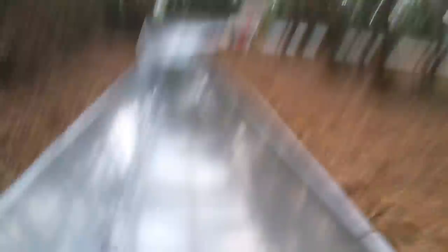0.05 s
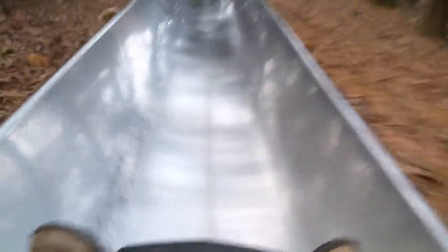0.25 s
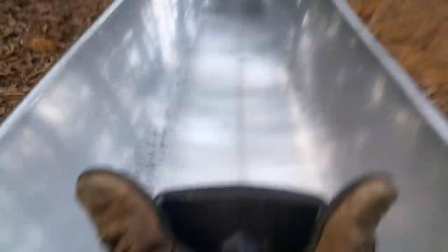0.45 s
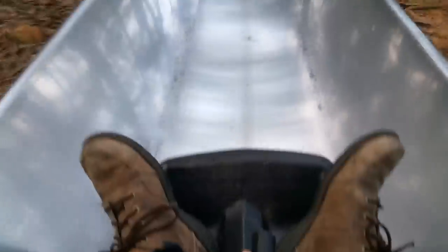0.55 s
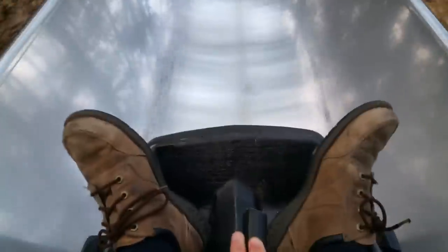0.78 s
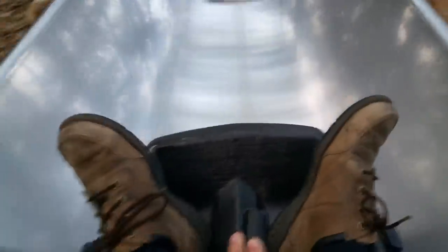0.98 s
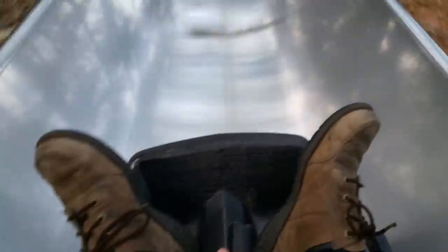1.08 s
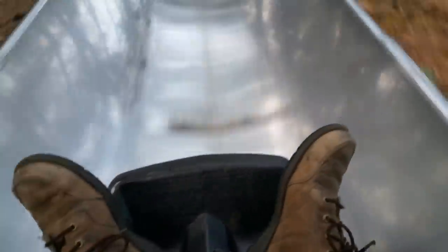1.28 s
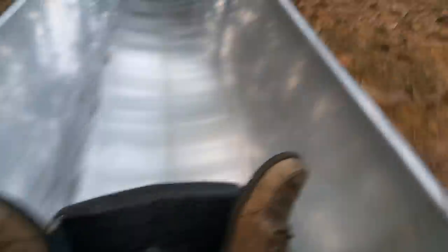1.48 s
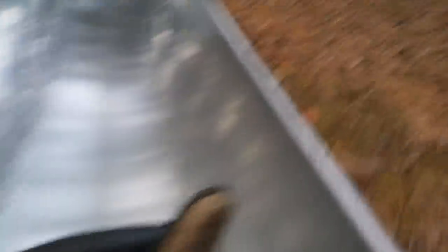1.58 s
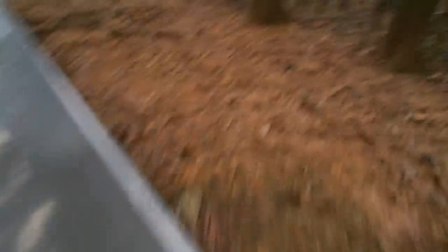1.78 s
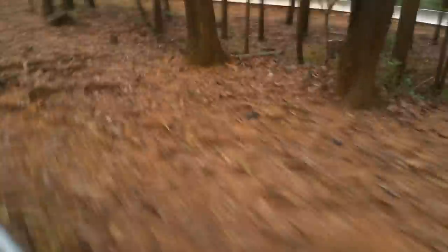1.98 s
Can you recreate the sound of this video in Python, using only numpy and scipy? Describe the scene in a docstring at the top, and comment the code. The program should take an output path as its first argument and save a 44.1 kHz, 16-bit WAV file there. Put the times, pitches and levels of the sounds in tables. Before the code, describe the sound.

A sled rumbles and hisses down a metal chute outdoors, heard from the rider's seat. It bangs and clatters over two seams, quietens, then knocks over a third, as loose fittings rattle and light wind brushes the microphone.

```python
"""A sled runs down a sheet-metal chute in a wood, heard from the rider's seat.
From the start the runners rumble and hiss on the metal and wind brushes the microphone.
Small bumps knock the hollow body into resonance, and loose fittings rattle. Near 0.5 s the sled
bangs and clatters across a seam, and near 0.9 s, hardest of all, across a second.
The ride then quietens until a third seam at 1.7 s, and runs on to the end at about 2 s."""
import sys
import numpy as np
from scipy import signal
from scipy.fft import rfft, irfft
from scipy.io import wavfile

SR = 44100
rng = np.random.default_rng(int(sys.argv[2]) if len(sys.argv) > 2 else 0)


def pcm_store(signal):
    """Save signal as 16-bit PCM."""
    levels = np.round(np.clip(np.atleast_2d(signal), -1, 1) * 32767)
    wavfile.write(sys.argv[1], SR, levels.astype(np.int16).T)


N = 90404

# Spectrum of the wind's buffeting; all spectra give relative levels (f/Hz, level/dB)
WIND_SPECTRUM = [(15, -33), (40, 15), (80, 11), (140, -1.5), (400, -36), (16000, -97)]
WIND_DB = -48

# Course of the running noise (t/s, rumble level/dB, hiss level/dB, deep rumble level/dB)
RIDE_LEVELS = [(0, -34.5, -40.5, -44), (.19, -35.5, -42, -53), (.27, -30.5, -39, -33), (.36, -34, -39, -34),
               (.45, -39, -40.5, -47), (.58, -40, -34, -29), (.68, -36.5, -38.5, -39),
               (.79, -37, -41.5, -27.5), (.85, -29.5, -41.5, -35), (.91, -30, -39.5, -24),
               (1.06, -26.5, -38.5, -38), (1.17, -32, -44, -34), (1.229, -33, -50.5, -44.5),
               (1.39, -37, -51.5, -45), (1.55, -35.5, -53, -43.5), (1.68, -33.5, -52, -39.5),
               (1.78, -29, -45, -39), (1.952, -37, -47, -42.5), (2.05, -31, -38.5, -34)]
# Spectrum of the runners' rumble (f/Hz, level/dB)
RUMBLE_SPECTRUM = [(25, -30.5), (110, -17), (175, -15), (220, -0.5), (255, -3), (300, 2), (350, -10),
                   (430, -12), (520, -3.5), (620, -18.5), (720, -11), (950, -22.5), (1400, -24.5),
                   (2000, -37.5), (5000, -42), (16000, -66)]
# Spectrum of the sliding hiss (f/Hz, level/dB)
HISS_SPECTRUM = [(100, -23), (390, -2.5), (520, 7), (750, 8.5), (1100, 2), (1500, 2), (2000, -7),
                 (2600, -3.5), (3100, -8.5), (3800, -8), (5000, -12), (7200, -12), (8200, -25.5),
                 (12000, -25.5), (16000, -29)]
# Spectrum of the deep rumble (f/Hz, level/dB)
DEEP_SPECTRUM = [(20, -19), (45, 5.5), (80, 4), (115, 4.5), (165, 4), (240, -2.5), (500, -28), (16000, -78)]
JUDDER_DB, JUDDER_HZ = 1.76, 46

# Free vibrations of the metal (f/Hz, level/dB, t60/s)
METAL_MODES = [(918, -2, 0.26), (1032, -11, .15), (1089, 0, 0.16), (1252, 0.5, 0.086), (1500, 3, 0.12),
               (2670, 9, 0.055), (3630, 0, 0.065), (3800, -0.5, 0.095), (4730, -10, .1), (5740, 0.5, 0.078),
               (6500, -2, 0.074), (7320, -20, 0.057)]
# Impacts of loose fittings (t/s, level/dB, treble corner f/Hz)
FITTING_STRIKES = [(0.054, -28.5, 5800), (0.0748, -23.5, 14200), (0.114, -34.5, 9900), (.126, -29, 5800),
                   (.199, -39, 7000), (0.21, -26.5, 6000), (0.231, -30.5, 6890), (0.273, -31, 4800),
                   (.281, -31, 5900), (0.365, -28, 6230), (0.386, -39, 7000), (0.429, -31.5, 9240),
                   (.498, -12.5, 9600), (.533, -16, 16000), (0.568, -24.5, 16000), (.604, -31, 14500),
                   (0.749, -29.5, 6000), (0.817, -28, 12100), (0.83, -29.5, 10700), (.853, -35, 6000),
                   (.891, -36.5, 9000), (0.902, -41, 6000), (0.955, -30, 16000), (1.123, -28, 15050),
                   (1.138, -57, 7000), (1.156, -27, 11000), (1.275, -42.5, 10600), (1.284, -52, 7000),
                   (1.425, -50, 9000), (1.451, -50, 12000), (1.571, -46.5, 9000), (1.643, -48, 10000),
                   (1.746, -24, 12900), (1.778, -27.5, 12200), (1.814, -31.5, 9900), (1.869, -31, 6950),
                   (1.887, -35.5, 13800), (1.974, -43, 7000), (1.998, -35.5, 9100), (2.013, -32, 8900),
                   (2.031, -29, 11900)]
# Spectrum of a fitting's tick (f/Hz, level/dB)
TICK_SPECTRUM = [(200, 10), (1500, -12), (2800, -8), (3750, 4), (4900, -4.5), (5850, 5.5), (6400, -3),
                 (7050, 0.5), (8300, -13.5), (9500, -9), (10400, -4.5), (13000, -10.5), (16000, -12)]
TICK_RISE_S, TICK_T60, TICK_TAIL_DB, TICK_TAIL_T60, TICK_RING_DB = 0.0012, 0.04, -24, 0.15, -15

# Runners meeting seams and dents (t/s, hold/s, level/dB, release t60/s, treble corner f/Hz)
RUNNER_CLASHES = [(0.472, 0.0084, -26.5, 0.03, 5200), (0.483, 0.03, -21.5, 0.11, 14000),
                  (0.511, 0.0076, -24, 0.073, 5100), (0.524, .012, -23, 0.12, 15000),
                  (0.561, .005, -32.5, .1, 14000), (0.651, 0.0019, -26.5, 0.03, 3000),
                  (0.705, 0.0046, -31.5, 0.035, 1510), (0.803, 0.031, -34, .1, 6000),
                  (0.92, 0.041, -18.5, 0.24, 13900), (0.933, .004, -10, 0.031, 1430),
                  (1.021, .007, -24.5, 0.19, 7560), (1.08, .003, -39, 0.039, 2500),
                  (1.172, 0.0032, -24, 0.058, 2130), (1.324, 0.0022, -36, 0.068, 2000),
                  (1.41, .004, -41, 0.044, 1490), (1.483, 0.0038, -35, 0.047, 2230),
                  (1.701, 0.021, -26.5, 0.13, 12400), (1.738, 0.0072, -33, 0.073, 15000),
                  (1.77, .006, -35.5, 0.044, 12000), (1.81, .012, -30.5, 0.071, 1700)]
# Spectrum of a clash (f/Hz, level/dB)
CLASH_SPECTRUM = [(40, -15.5), (250, 4), (700, 7), (1100, 2), (1600, 2.5), (2100, -7), (3000, -6),
                  (3750, -4), (5000, -8.5), (6300, -9.5), (8000, -13.5), (11500, -16), (16000, -19)]
METAL_RISE_S, CLASH_RING_DB = 0.0039, -16

# Blows to the sled (t/s, level/dB, tone f/Hz, boom level/dB relative to BOOM_DB)
BLOWS = [(0.041, -29, 500, -20), (.220, -14, 190, 4.5), (0.254, -20.5, 190, 5.5), (.265, -15, 200, -3),
         (0.275, -18, 267, -9), (0.351, -22, 387, 13), (0.478, -11.5, 245, 6.5), (0.4994, -4.5, 222, -2),
         (.537, -12, 200, -4), (0.564, -18.5, 200, -1), (0.613, -23.5, 200, -14), (0.691, -20.5, 220, -1),
         (.763, -19, 180, 2), (0.794, -28, 180, 18), (.812, -18, 255, 2), (.838, -17.5, 277, -9),
         (.923, -7, 327, 2.5), (0.935, 0, 280, 6), (.953, -12.5, 283, 12), (0.97, -9, 230, -1),
         (.991, -8.5, 198, 14), (1.029, -7, 260, 8.5), (1.116, -23.5, 275, 13), (1.153, -17.5, 220, 3),
         (1.176, -15.5, 235, -12), (1.295, -24, 280, -9), (1.424, -26.5, 435, 4), (1.485, -24, 245, 6),
         (1.586, -28, 276, -14), (1.604, -22, 280, -18), (1.632, -27.5, 230, -27), (1.692, -18.5, 246, 8.5),
         (1.708, -3.5, 417, -32), (1.741, -18, 383, -2.5), (1.843, -30, 413, 4), (1.989, -17.5, 280, 7.5)]
# Resonances of the hollow body (f/Hz, level/dB, t60/s)
BODY_MODES = [(180, -10, 0.11), (219, 4, 0.08), (272.1, 2.5, 0.092), (298.5, -3, 0.14), (353, -3.5, 0.096),
              (447, -1, 0.08), (526.6, 2, 0.089), (758, -19, 0.17), (912, -1, 0.051), (1075, -3.5, 0.095),
              (1200, -17, 0.027), (1420, 1.5, 0.056)]
# Resonances of the deep boom under a blow (f/Hz, level/dB, t60/s)
BOOM_MODES = [(57.4, -9, 0.033), (87.2, -6.5, 0.1), (119, 2, 0.14)]
# Spectrum of the chute's shudder after a blow (f/Hz, level/dB)
SHUDDER_SPECTRUM = [(30, -57), (100, -31), (240, 18), (310, 3), (400, -16.5), (560, -1), (800, -14.5),
                    (1500, -19), (2100, -14), (5000, -25.5), (16000, -47)]
BODY_RISE_S, BOOM_RISE_S, BOOM_DB, SHUDDER_DB, SHUDDER_T60 = 0.0013, 0.002, -13.5, -10.5, 0.099

# Likeness of the sound at the two microphones (f/Hz, coherence, clipped to 1 in use)
COHERENCE = [(60, 4), (290, 0.92), (640, .8), (1410, 0.3), (3100, 0.01), (15000, 0)]
# Balance between the channels (f/Hz, left minus right level/dB)
BALANCE = [(60, 0.5), (200, 2), (380, 2), (700, -2), (1290, -4.5), (2380, 0.5), (4400, -4.5), (6000, -5.5),
           (8120, -3.5), (15000, -5)]
LOW_CUT_HZ, CEILING, BAND_LIMIT_HZ = 40, 0.93, 15850


def amp(db):
    """Amplitude ratio of a level in decibels."""
    return 10 ** (np.asarray(db) / 20)


def read(points, hz):
    """Interpolation of a table on a logarithmic frequency axis."""
    f, value = np.transpose(points)
    return np.interp(np.log(hz + 1), np.log(f + 1), value)


def unit(x):
    """Normalisation to an rms of 1."""
    return x / np.sqrt(np.mean(x ** 2) + 1e-20)


def since(start):
    """Elapsed time in seconds, zero before the start."""
    return np.maximum(np.arange(N) / SR - start, 0)


def decay(t, t60):
    """Exponential damping: 60 dB are lost in t60 seconds."""
    return np.exp(-np.log(1000) * t / t60)


def add(mix, start, sound):
    """Superposition of a sound on the mix from a given time."""
    part = mix[max(round(start * SR), 0):][:len(sound)]
    part += sound[:len(part)]


def colour(x, spectrum, size=4096):
    """Spectral shaping by a minimum-phase filter of unit energy."""
    log_gain = np.log(amp(read(spectrum, abs(np.fft.fftfreq(size, 1 / SR)))))
    response = np.exp(np.conj(signal.hilbert(log_gain)))
    taps = np.fft.ifft(response).real[:size // 2]
    return signal.oaconvolve(x, taps[None] / np.linalg.norm(taps), axes=1)[:, :N]


def low_pass(x, corner_hz):
    """Low-pass filtering: a softer contact excites less treble."""
    return signal.sosfilt(signal.butter(2, corner_hz, fs=SR, output="sos"), x)


def high_pass(x, corner_hz):
    """High-pass filtering: the bass falls away below the corner."""
    return signal.sosfilt(signal.butter(2, corner_hz, "high", fs=SR, output="sos"), x)


def cohere(independent):
    """Spatial coherence: long waves reach two close microphones alike, short waves do not."""
    a, b = rfft(independent)
    coherence = np.clip(read(COHERENCE, np.fft.rfftfreq(N, 1 / SR)), -1, 1)
    common, opposed = np.sqrt((1 + coherence) / 2) * a, np.sqrt((1 - coherence) / 2) * b
    return irfft(np.array([common + opposed, common - opposed]), N)


def noise():
    """Gaussian stereo noise, coherent in the bass."""
    return cohere(rng.standard_normal((2, N)))


def grit(per_s, spread_db):
    """Shot noise: dense, tiny contacts of uneven size."""
    sizes = amp(spread_db * np.minimum(rng.exponential(1, N), 4))
    touching = rng.random(N) < per_s / SR
    return unit(cohere(sizes * touching * rng.standard_normal((2, N))))


def wobble(rate_hz):
    """Random modulation of rms 1, mostly slower than the given rate."""
    rolloff = 1 + (np.fft.rfftfreq(N, 1 / SR) / rate_hz) ** 2
    return unit(irfft(rfft(rng.standard_normal(N)) / rolloff, N))


def ring(modes, rise_s, tone_hz=1, db_per_octave=0):
    """Modal superposition of damped sines, peak 1; a slope favours the modes near the blow's tone."""
    t = np.arange(SR // 2) / SR
    out = np.zeros(len(t))
    for hz, db, t60 in modes:
        drive = amp(db - db_per_octave * abs(np.log2(hz / tone_hz)))
        out += drive * decay(t, t60) * np.sin(2 * np.pi * hz * t)
    out *= 1 - np.exp(-t / rise_s)
    return out / abs(out).max()


def wind():
    """Turbulence: low pressure fluctuations, partly different at each microphone."""
    pressure = noise() + 0.54 * rng.standard_normal((2, N))
    gust_db = 1.3 * wobble(rate_hz=5.9)
    return amp(WIND_DB) * colour(pressure * amp(gust_db), WIND_SPECTRUM)


def runners():
    """Roughness excitation: uneven metal shakes the sled and hisses; rumble and hiss judder together."""
    judder_db = JUDDER_DB * wobble(JUDDER_HZ)
    times, *levels = np.transpose(RIDE_LEVELS)
    rumble_db, hiss_db, deep_db = (np.interp(since(0), times, db) for db in levels)
    rumble = colour(noise() * amp(rumble_db + judder_db), RUMBLE_SPECTRUM)
    friction = grit(per_s=5000, spread_db=-1)
    hiss = colour(friction * amp(hiss_db + 0.5 * judder_db), HISS_SPECTRUM)
    deep = colour(noise() * amp(deep_db), DEEP_SPECTRUM)
    return rumble + hiss + deep


def metal_ring(force):
    """Resonance: the force is convolved with the impulse response of the metal's bright modes."""
    response = ring(METAL_MODES, METAL_RISE_S)
    return signal.oaconvolve(force, response[None] / np.linalg.norm(response), axes=1)[:, :N]


def loose_fittings():
    """Impact noise: each fitting gives a tick with a fast and a slow decay, and rings the metal."""
    t, bursts = np.arange(SR // 5) / SR, np.zeros((2, N))
    release = decay(t, TICK_T60) + amp(TICK_TAIL_DB) * decay(t, TICK_TAIL_T60)
    envelope = np.minimum(t / TICK_RISE_S, 1) * release
    for start, db, corner_hz in FITTING_STRIKES:
        for channel in bursts:
            add(channel, start, amp(db) * low_pass(envelope * rng.standard_normal(len(t)), corner_hz))
    ticks = colour(bursts, TICK_SPECTRUM)
    return ticks + amp(TICK_RING_DB) * metal_ring(ticks)


def seam_clashes():
    """Impulsive excitation: runners cross a seam or dent in a burst of contacts that rings the metal."""
    contacts, force = grit(per_s=8800, spread_db=2), np.zeros((2, N))
    for start, hold, db, t60, corner_hz in RUNNER_CLASHES:
        envelope = np.minimum(since(start) / METAL_RISE_S, 1) * decay(since(start + hold), t60)
        force += low_pass(contacts * amp(db) * envelope, corner_hz)
    return colour(force, CLASH_SPECTRUM) + amp(CLASH_RING_DB) * metal_ring(force)


def body_blows():
    """Free vibration: each blow leaves the hollow sled ringing and the chute shuddering."""
    knocks, shudder, vibration = np.zeros(N), np.zeros((2, N)), noise()
    t = np.arange(SR // 2) / SR
    shudder_shape = (1 - np.exp(-t / BODY_RISE_S)) * decay(t, SHUDDER_T60)
    for start, db, tone_hz, boom_db in BLOWS:
        bass_cut_hz = 0.34 * tone_hz  # a high-toned blow has little bass
        body = high_pass(ring(BODY_MODES, BODY_RISE_S, tone_hz, db_per_octave=13), bass_cut_hz)
        boom = amp(boom_db + BOOM_DB) * ring(BOOM_MODES, BOOM_RISE_S)
        add(knocks, start, amp(db) * (body + boom))
        envelope = np.full(N, 1e-12)
        add(envelope, start, amp(db) * shudder_shape)
        shudder += high_pass(vibration * envelope, bass_cut_hz)
    return knocks + amp(SHUDDER_DB) * colour(shudder, SHUDDER_SPECTRUM)


def scene():
    """Superposition of all sources; a level difference sets the treble a little to the right."""
    mix = body_blows() + seam_clashes() + loose_fittings() + runners() + wind()
    balance_db = read(BALANCE, np.fft.rfftfreq(2 * N, 1 / SR))
    return irfft(rfft(mix, 2 * N) * amp([balance_db / 2, -balance_db / 2]))[:, :N]


def record(dry):
    """Soft saturation rounds the hardest bangs, after a bass cut and before the band limit."""
    x = high_pass(dry, LOW_CUT_HZ)
    rounded = x / (1 + (x / CEILING) ** 4) ** 0.25
    band_limit = signal.firwin(511, BAND_LIMIT_HZ, window=("kaiser", 9), fs=SR)
    return signal.oaconvolve(rounded, band_limit[None], "same")


dry = scene()
out = record(dry)
pcm_store(out)
```